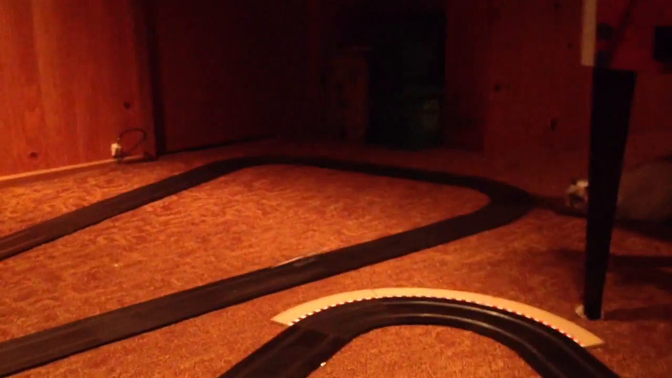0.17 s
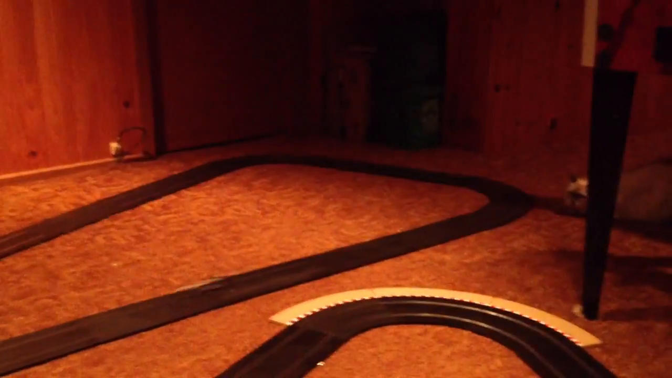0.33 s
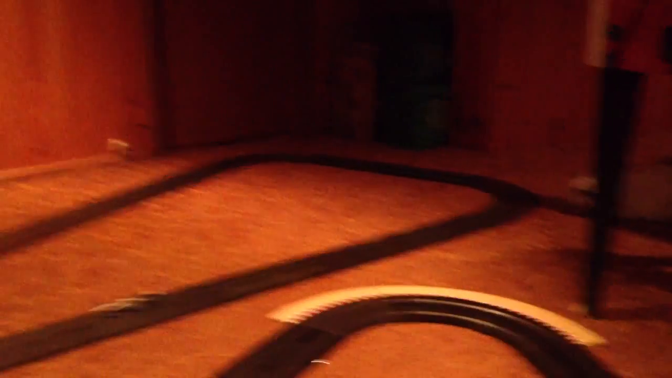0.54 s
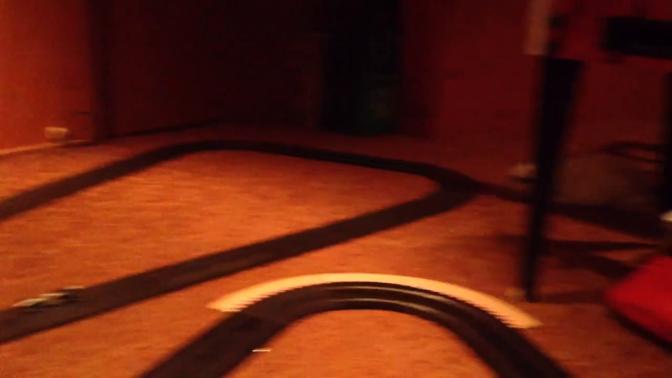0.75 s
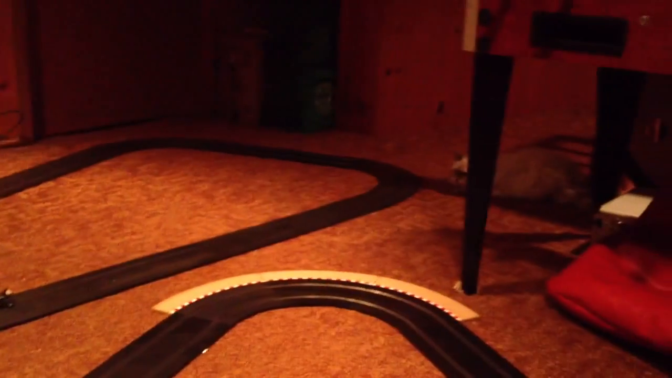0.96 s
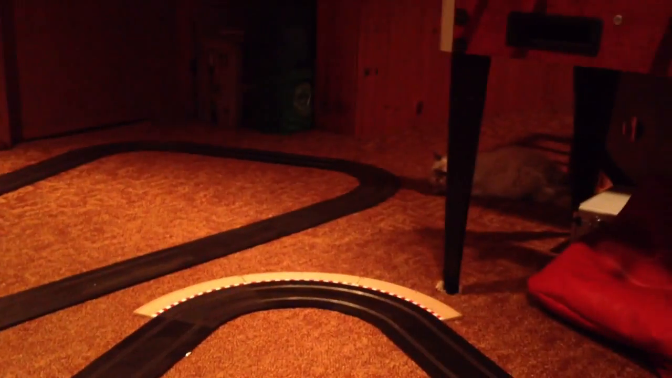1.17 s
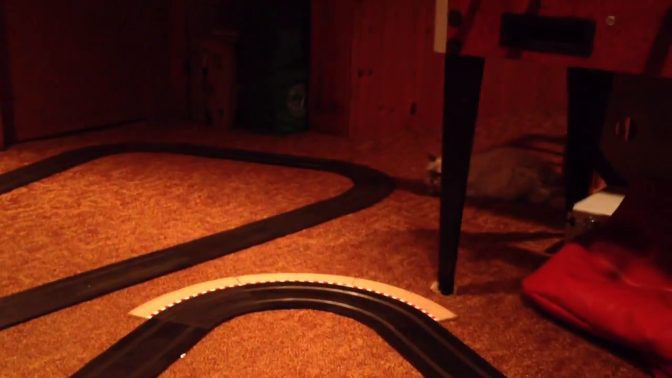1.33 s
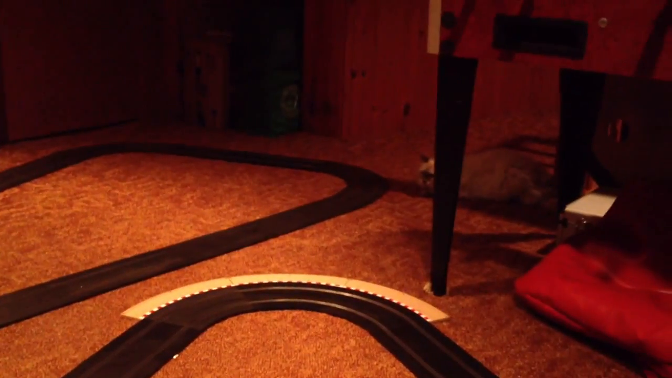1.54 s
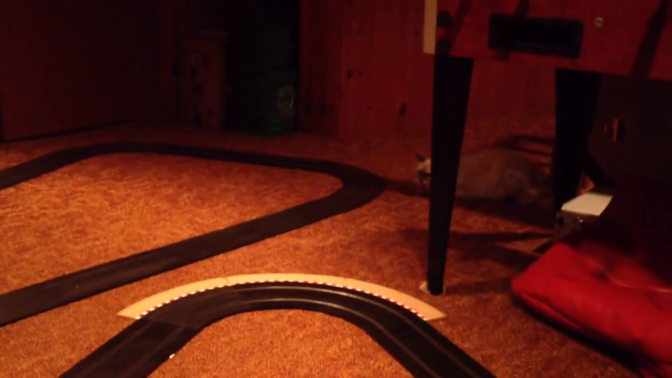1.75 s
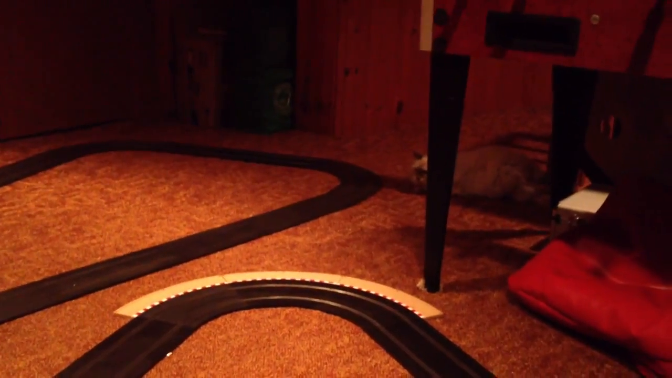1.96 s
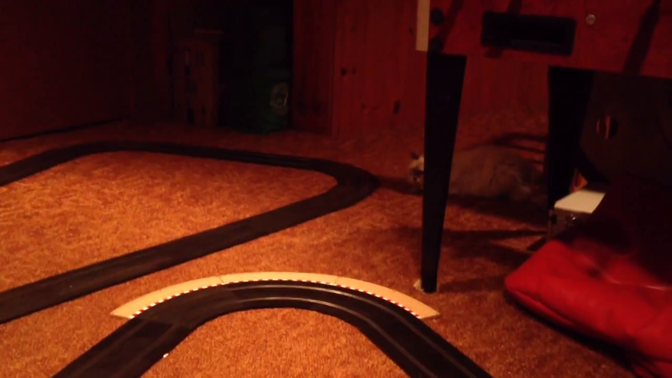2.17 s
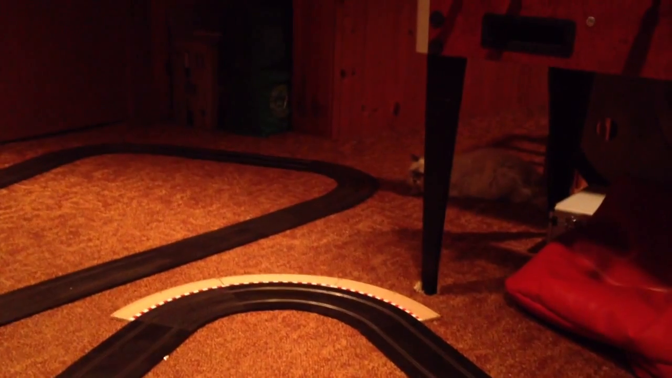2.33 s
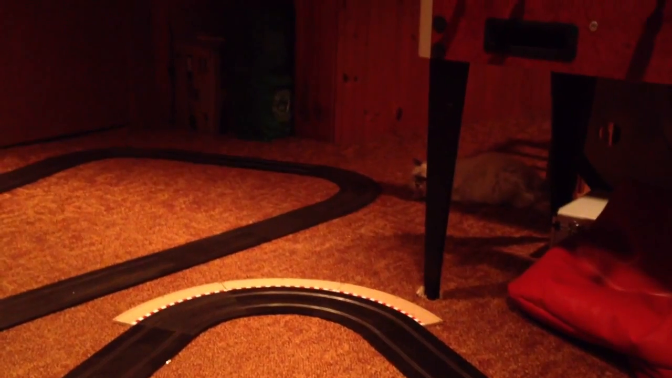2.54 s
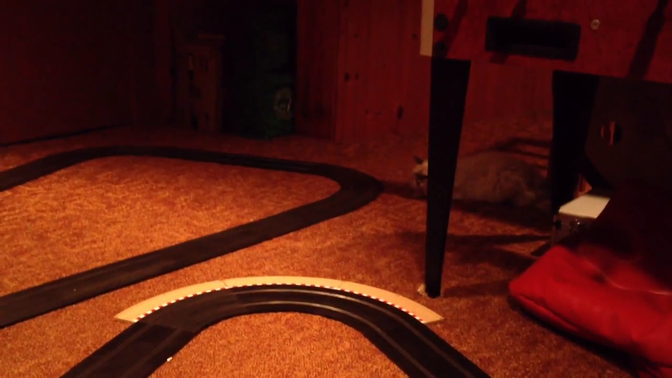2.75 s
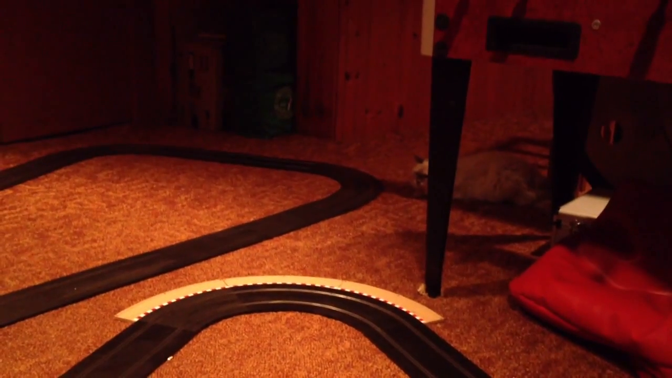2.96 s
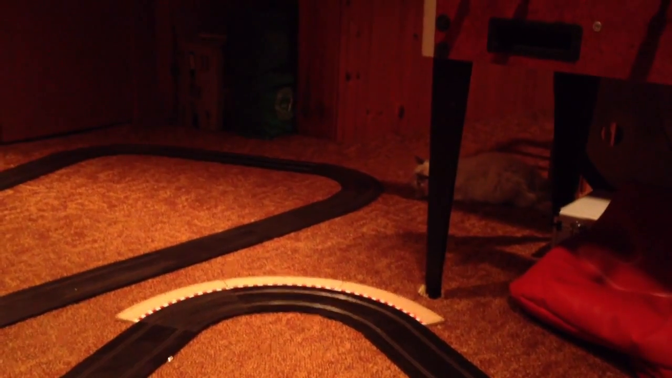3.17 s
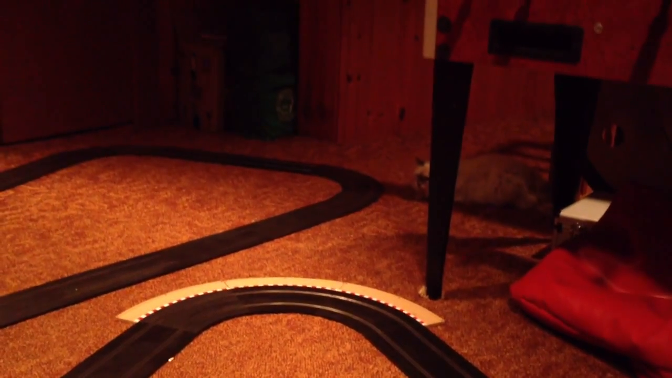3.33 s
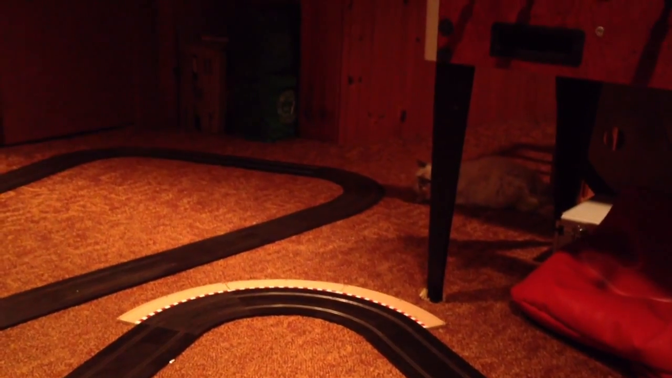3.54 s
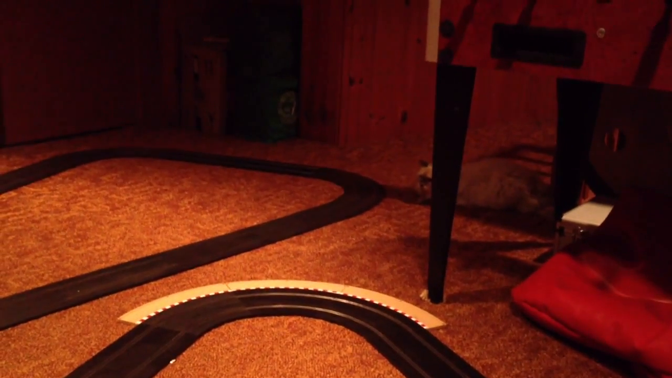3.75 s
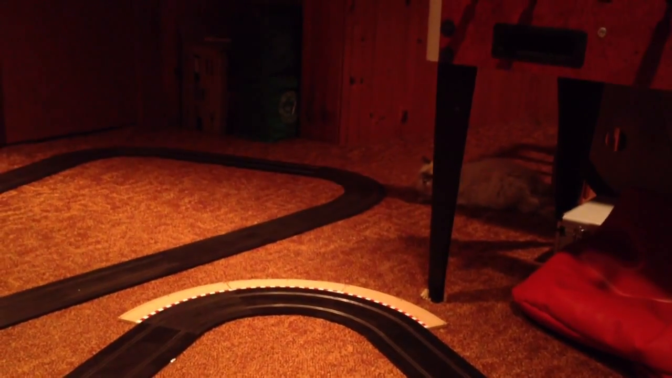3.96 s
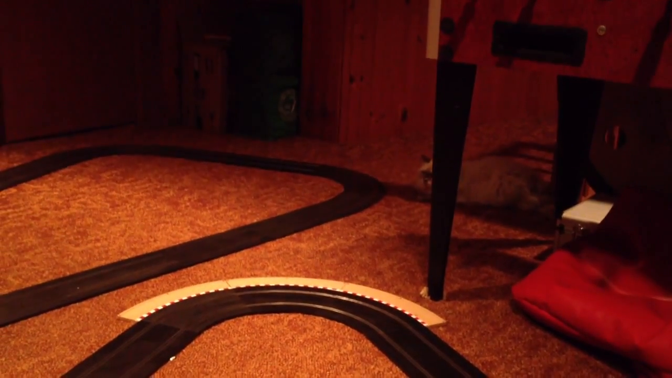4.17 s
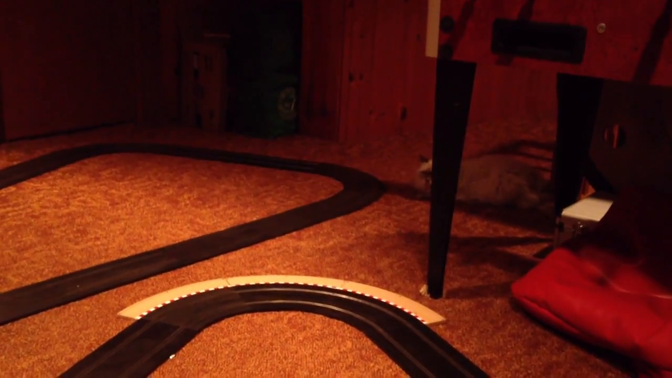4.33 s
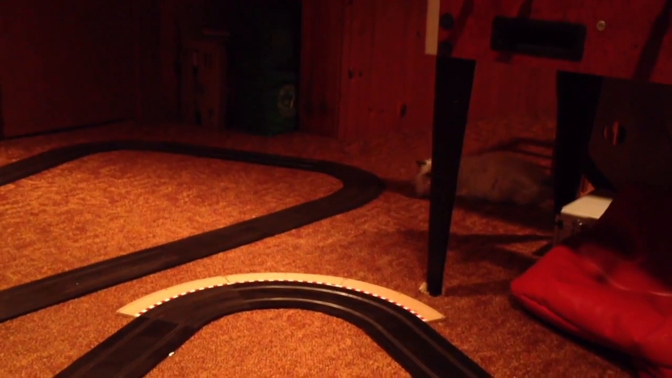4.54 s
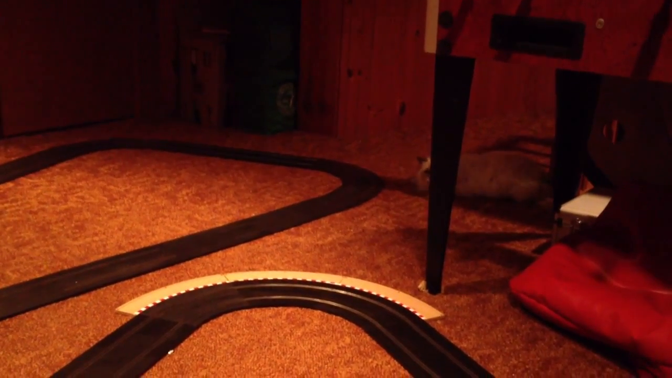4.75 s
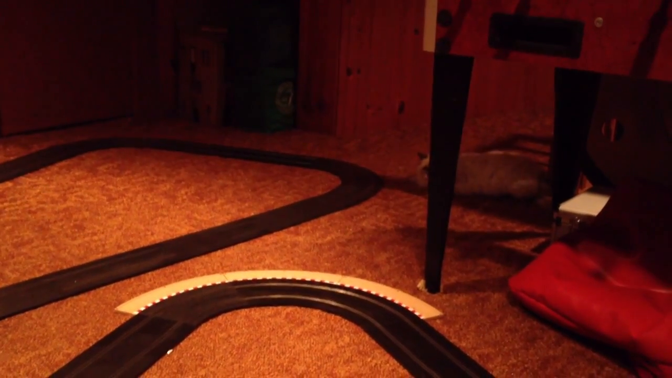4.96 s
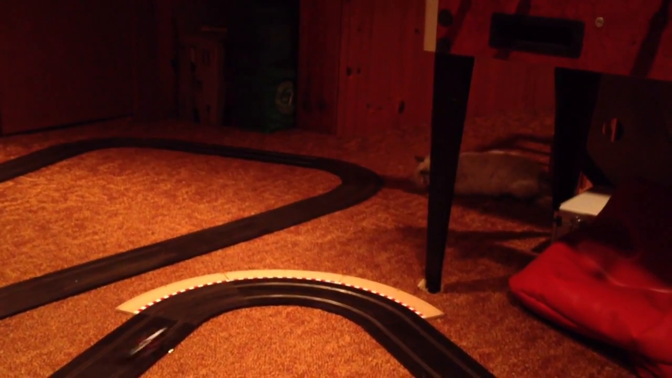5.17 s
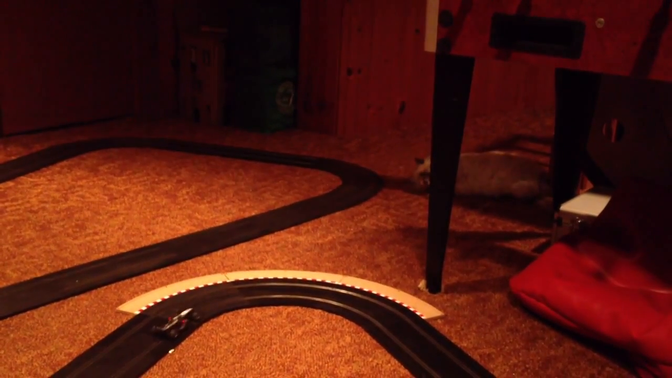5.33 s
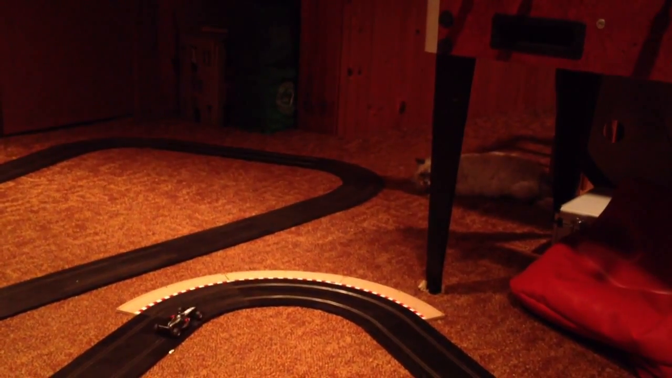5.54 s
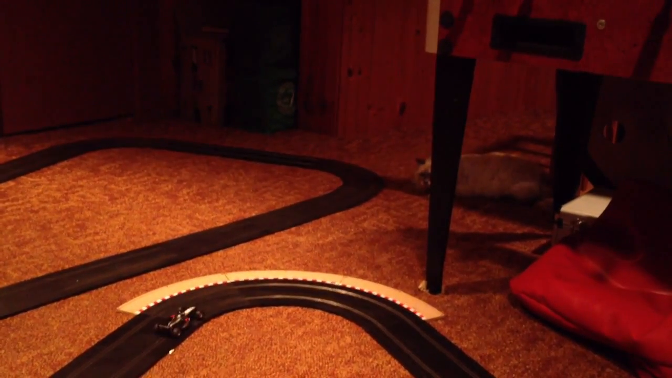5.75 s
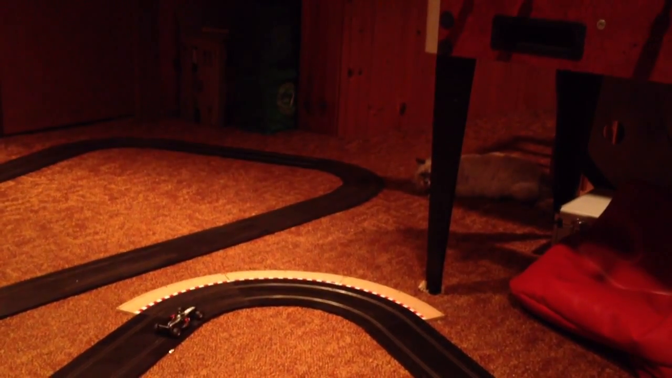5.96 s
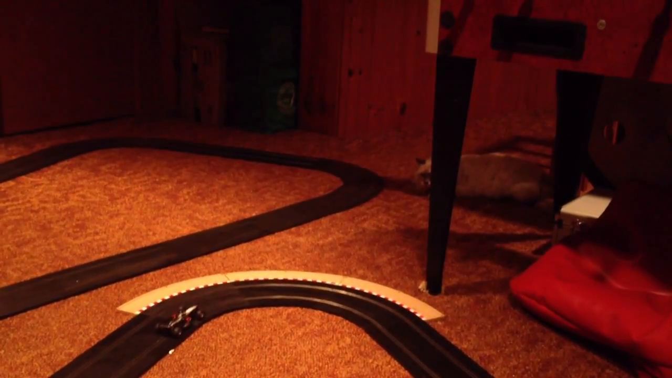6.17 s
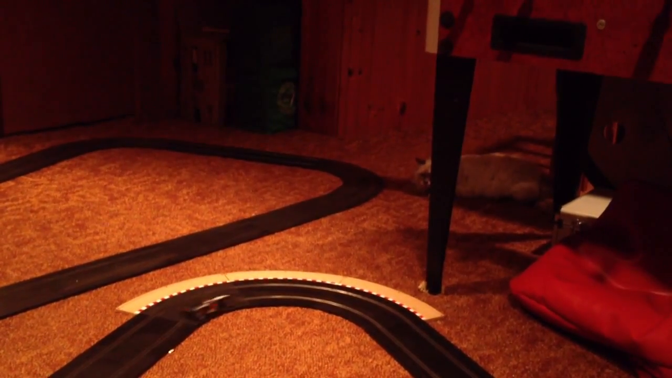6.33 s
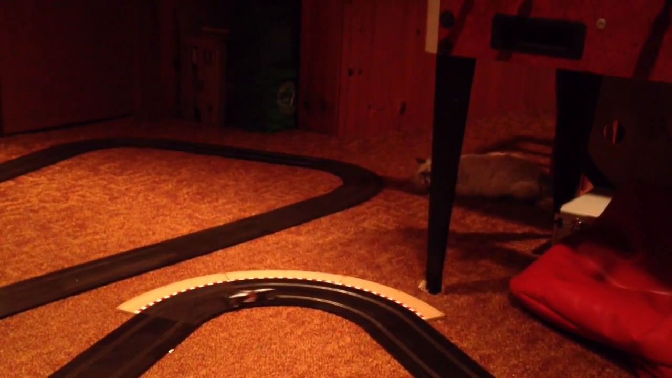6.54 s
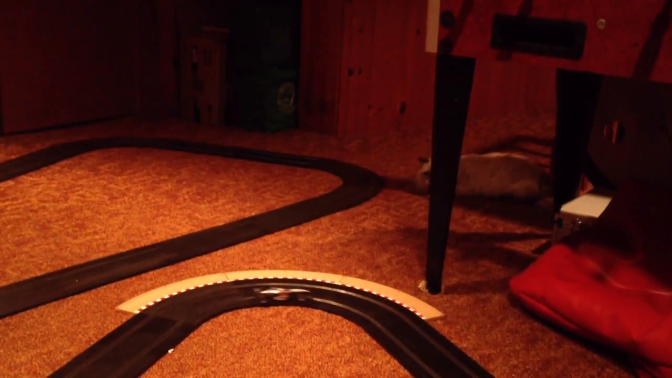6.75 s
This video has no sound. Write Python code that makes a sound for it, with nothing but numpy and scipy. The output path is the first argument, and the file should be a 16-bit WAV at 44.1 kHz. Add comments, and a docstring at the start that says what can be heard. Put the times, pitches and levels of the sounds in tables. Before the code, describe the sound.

A small electric slot car whirs and rattles round plastic track in spurts, coasting to rests, then buzzes loudly close past and sets off again.

```python
"""A toy slot car is already rolling round a plastic track in a small carpeted, wood-panelled room. Its gears rattle
the shell, the motor knocks once a turn, the braids hiss and the tyres rumble in the hollow track. At once the hand
controller scrapes, its spring ticks and the car snags in its slot. It coasts to rest, then runs again in spurts;
plastic creaks, the track panels drone, and a rising swish leads into a close pass by the microphone near 4.8 s.
It coasts down once more and sets off again. Each part is noise or short clicks, shaped by filters and echoes."""
import sys
import numpy as np
from scipy import signal
from scipy.fft import rfft, irfft
from scipy.io import wavfile
from scipy.ndimage import uniform_filter1d, map_coordinates

SR = 44100
rng = np.random.default_rng(int(sys.argv[2]) if len(sys.argv) > 2 else 0)


def digitize_waveform(pressure):
    """Quantize a signal to 16-bit integers and store it at the path in sys.argv[1].

    Rows of a 2-D input are taken as channels; values are limited to [-1, 1].
    """
    field = np.atleast_2d(pressure).T
    bounded = np.clip(field, -1, 1)
    quanta = np.round(bounded * 32767).astype(np.int16)
    wavfile.write(sys.argv[1], SR, quanta)


N = 299880  # samples, 6.8 s


def undb(db):
    """Turn decibels into a gain."""
    return 10 ** (np.asarray(db) / 20)


def unit(x):
    """Scale a sound to an average strength (rms) of 1."""
    return x / np.sqrt(np.mean(x ** 2))


def curves(table):
    """Join each column of a table by straight lines in time; the first column is the time."""
    s, *columns = np.transpose(table)
    t = np.arange(N) / SR
    return [np.interp(t, s, column) for column in columns]


def walk(rate_hz):
    """A smooth random wander with an rms of 1, taking about rate_hz new values a second."""
    hold = max(int(SR / rate_hz), 1)
    steps = np.repeat(rng.standard_normal(N // hold + 1), hold)
    return unit(uniform_filter1d(steps, hold)[:N])


def colour(x, spectrum, size=4096):
    """Filter a sound to a spectrum of (pitch_hz, level_db) points, with no sound before its cause."""
    hz, db = np.transpose(spectrum)
    bins = np.maximum(np.fft.rfftfreq(size, 1 / SR), 1)
    gain = undb(np.interp(np.log(bins), np.log(hz), db))
    # folding the cepstrum gives the filter minimum phase: its energy comes as early as it can
    cepstrum = irfft(np.log(gain))
    cepstrum[1:size // 2] *= 2
    cepstrum[size // 2 + 1:] = 0
    response = irfft(np.exp(rfft(cepstrum)))
    return signal.fftconvolve(x, response)[:len(x)]


def brighter(spectrum, treble_db):
    """The same spectrum with everything above 5 kHz raised."""
    return [(hz, db + treble_db * (hz > 5000)) for hz, db in spectrum]


def resonate(x, modes):
    """Sum of fixed resonances, each given as (pitch_hz, width_hz, level_db)."""
    return sum(undb(db) * signal.lfilter(*signal.iirpeak(hz, hz / width, SR), x) for hz, width, db in modes)


def ring(x, hz, width_hz):
    """A resonance whose pitch may move from moment to moment, with an rms of 1."""
    spin = np.exp(2j * np.pi * np.cumsum(hz * np.ones(len(x))) / SR)
    lowpass = signal.butter(2, width_hz / 2, fs=SR, output="sos")
    # shift the pitch down to zero, keep what lies near it, and shift back up
    near_pitch = signal.sosfilt(lowpass, x / spin + 1e-18)
    return unit(np.real(spin * near_pitch))


def grains(rate_hz, spread_db):
    """Tiny contacts at random moments and of uneven hardness, with an rms of 1."""
    hardness = np.minimum(rng.exponential(size=N), 4)
    happens = rng.random(N) < rate_hz / SR
    return unit(happens * rng.choice([-1, 1], N) * undb(spread_db * hardness))


def contact(rise_s, size=4096):
    """A short rough contact: noise that swells and dies."""
    age = np.arange(size) / SR / rise_s
    return rng.choice([-1, 1], size) * age * np.exp(1 - age)


def add(out, s, sound, peak_db):
    """Put a sound in at time s with the given peak level."""
    i = int(np.clip(s * SR, 0, N - 1))
    scaled = undb(peak_db) * sound / np.abs(sound).max()
    out[i:i + len(sound)] += scaled[:N - i]


def swell(s, rise_s, fall_s, db):
    """Gain of one movement: it grows to its peak at time s and falls back to silence."""
    return undb(db) * np.interp(np.arange(N) / SR, [s - rise_s, s, s + fall_s], [0, 1, 0])


# spectrum of the steady background: pitch_hz, relative_level_db
HUSH_SPECTRUM = [(15, -46), (86, -27.5), (119, -16), (178, -11), (305, -13.5), (631, -18.5), (895, -20),
                 (970, -20.5), (6210, -25), (9050, -30), (13900, -28), (15500, -27)]
HUSH_DB = -66.5


def background():
    """Steady background: low noise of the quiet room plus a faint hiss."""
    return unit(colour(rng.standard_normal(N), HUSH_SPECTRUM)) * undb(HUSH_DB)


# spurts of throttle:
# pressed_s, released_s, top_motor_turns_hz, coast_to_rest_s, gear_load_db, tyre_load_db
SPURTS = [(-.3, 0.202, 110.8, 0.72, -1.5, -1), (1.399, 1.681, 100.3, 0.46, -2, -1.5),
          (1.868, 2.048, 100.3, 0.13, 0, -1), (2.427, 4.864, 101.3, 0.82, 0.5, -1.5),
          (5.383, 5.452, 60.1, 0.11, -0.5, -1), (6.088, 6.362, 92.5, 0.53, -5, -5.5),
          (6.304, 6.904, 79.5, 0.37, -6, -7)]
SPIN_UP_S, FREEWHEEL_S = .05, 0.22  # time constants: the motor takes up speed; gears go slack after release


def drive():
    """The motor spins up from each press, and friction slows it after release; the fastest spurt rules."""
    t = np.arange(N) / SR
    pressed, released, hz, coast_s, gear_db, tyre_db = np.transpose(SPURTS)[:, :, None]
    since_press = np.maximum(t - pressed, 0)
    since_release = np.maximum(t - released, 0)
    spin_up = 1 - np.exp(-since_press / SPIN_UP_S)
    slow_down = np.clip(1 - since_release / coast_s, 0, 1)
    speeds = hz * spin_up * slow_down
    spurt = speeds.argmax(axis=0)
    freewheel = 1 - np.exp(-since_release[spurt, np.arange(N)] / FREEWHEEL_S)
    # a floor of 1 turn a second keeps the logarithm of speed finite at rest
    return np.maximum(speeds.max(axis=0), 1), freewheel, gear_db[spurt, 0], tyre_db[spurt, 0]


# the car's way round the track, and how its chassis rings there:
# time_s, microphone_distance_m, chassis_against_rattle_db, chassis_pitch_hz (the pitch drifts about this)
PATH = [(.12, 0.85, -1.5, 4320), (.3, 0.86, -3.5, 4230), (.55, 0.68, -8, 4370), (1.6, 1.1, -5, 4370),
        (2.0, 1.58, -7, 4180), (2.6, 1.6, -4, 4220), (3.15, 1.22, -2, 4270), (3.5, 0.88, -2, 4160),
        (3.73, 0.8, -3, 4118), (4.15, 0.66, -5.5, 4050), (4.33, 0.91, -3, 4250), (4.46, 1.02, -6, 4440),
        (4.69, 0.6, -12, 4255), (4.765, 0.21, -2.5, 4000), (4.85, 0.25, -1.5, 3927),
        (5.07, 0.34, -4.5, 4406), (5.5, 0.65, -10, 4660), (6.2, 0.5, -8, 4660), (6.8, 1.1, -1.5, 4340)]


def travel():
    """Distance to the microphone, and level and pitch of the chassis ring, gliding along the path."""
    return curves(PATH)


# how loud each part is, before load and wavering:
# level_at_reference_speed_and_1_m_db, gain_per_tenfold_speed_db, loss_per_tenfold_distance_db, coasting_gain_db
RUMBLE_LAW = (-59.5, 33, 20, 3)
RATTLE_LAW = (-51, 41.5, 22, -2.5)
HISS_LAW = (-58.5, 46.5, 28, -1.5)
REFERENCE_HZ = 100  # motor turns a second


def loudness(law, motor_hz, distance, freewheel):
    """Level in dB of one part of the car: louder when fast and near."""
    db, speed_db, distance_db, coasting_db = law
    speed_gain_db = speed_db * np.log10(motor_hz / REFERENCE_HZ)
    distance_loss_db = distance_db * np.log10(distance)
    return db + speed_gain_db - distance_loss_db + coasting_db * freewheel


def each_turn(turn, decay_s, uneven_db):
    """A short burst of noise once a motor turn, with a random strength each time; rms 1."""
    lap = turn.astype(int)
    age = (np.arange(N) - np.searchsorted(lap, lap)) / SR
    force = undb(uneven_db * np.clip(rng.standard_normal(lap[-1] + 1), -2, 2))[lap]
    return unit(force * np.exp(-age / decay_s) * rng.standard_normal(N))


def axle(turn, slop_turns=.13, uneven_db=6.0, offbeat_db=-3):
    """The axle hits its bearings about twice a motor turn, early or late, hard or soft."""
    beats = np.arange(2 * int(turn[-1]))
    late, force, sign = rng.standard_normal((len(beats), 3)).T
    at = np.minimum(np.searchsorted(turn, beats / 2 + slop_turns * late), N - 1)
    hits = np.zeros(N)
    hits[at] = np.sign(sign) * undb(uneven_db * np.clip(force, -2, 1) + offbeat_db * (beats % 2))
    return unit(hits)


# spectrum of the rattling shell: pitch_hz, relative_level_db
SHELL_SPECTRUM = [(470, -23), (800, -25.5), (1120, -2), (2000, -1.5), (2210, -5.5), (2410, 1), (2830, -2.5),
                  (3460, -1.5), (3960, 0.5), (5680, -7), (7180, -9.5), (9680, -18.5), (11400, -11.5),
                  (14400, -13), (15500, -39)]
# spectrum of a motor knock or of a snag in the slot: pitch_hz, relative_level_db
KNOCK_SPECTRUM = [(60, -79), (300, -38), (900, -17), (2200, 3), (3000, -3.5), (3800, 3), (4600, 4),
                  (5400, -7), (8000, -5), (10000, -10), (11500, -4.5), (13500, -11), (15500, -21)]
# the chassis rings in two bands: pitch_ratio, width_hz, level_db (drifts follow)
CHASSIS_BANDS = [(1, 770, 0), (.5, 430, -9)]


def gears(turn, rattle_db, chassis_db, chassis_hz, knock_db=-9, axle_db=2, teeth_db=-1.0,
          wobble=0.13, drift=0.033, flutter_db=2.0):
    """Teeth click against the shell; the pinion knocks once a turn; teeth and axle ring the chassis."""
    knocks = unit(colour(each_turn(turn, decay_s=.0006, uneven_db=2.5), KNOCK_SPECTRUM))
    once_a_turn = 1 + wobble * np.cos(2 * np.pi * turn)
    teeth = grains(3200, spread_db=2.5) * undb(2.3 * walk(60)) * once_a_turn
    shaking = grains(3200, spread_db=2.5) + undb(axle_db) * axle(turn)
    # the chassis flexes as the car rolls, so each ring drifts in pitch and strength
    chassis = np.zeros(N)
    for ratio, width_hz, db in CHASSIS_BANDS:
        band_hz = ratio * chassis_hz * (1 + drift * walk(12))
        chassis += ring(shaking, band_hz, width_hz) * undb(db + flutter_db * walk(11))
    shell = undb(teeth_db) * unit(colour(teeth, SHELL_SPECTRUM))
    return (shell + undb(knock_db) * knocks + undb(chassis_db) * chassis) * undb(rattle_db)


# spectrum of the rubbing copper braids: pitch_hz, relative_level_db
BRAID_SPECTRUM = [(3000, -50), (5200, -8), (6600, -3.5), (7900, -3), (9300, -8), (15500, -26)]
# spectrum of the braids' sparks: pitch_hz, relative_level_db
SPARK_SPECTRUM = [(900, -46), (3000, 13), (4300, 5), (5500, 4), (10000, -4), (11500, -3.5), (13200, -8),
                  (15500, 3.5)]


def braids(hiss_db, freewheel, turn, spark_db=0):
    """Copper braids rub along the rails; sparks tick once each motor turn and fade after release."""
    rub = unit(colour(grains(5000, spread_db=1.5), BRAID_SPECTRUM))
    sparks = unit(colour(each_turn(turn, decay_s=.0007, uneven_db=3.5), SPARK_SPECTRUM))
    current = undb(spark_db) * np.clip(1 - freewheel, 0, 1)
    return (rub + current * sparks) * undb(hiss_db + 1.66 * walk(30))


# spectrum of the rumbling track: pitch_hz, relative_level_db
TRACK_SPECTRUM = [(35, -50), (60, -61), (96, -12), (135, -11.5), (167, -4.5), (280, -2), (465, -0.5),
                  (562, -6.5), (655, -6), (772, -6), (868, -4.5), (921, -10), (1000, -7.5), (1300, -29),
                  (2200, -120)]
# resonances of the hollow track: pitch_hz, width_hz, level_db (each is passed through twice)
HOLLOW_MODES = [(347, 97, 3.5), (400, 45, -2), (512, 72, 2), (663, 260, 1), (700, 110, -13)]
# loose pieces of track boom as the car rolls over them, each on its own note:
# loudest_s, rise_s, fall_s, level_db, pitch_hz
BOOMS = [(.35, 0.11, 0.08, -57, 510), (2.9, 0.3, .5, -65, 426), (4.17, 0.35, .5, -68, 115),
         (4.57, 0.33, 0.2, -58.5, 440), (4.8, 0.29, 0.16, -48.5, 422), (5.06, 0.086, 0.097, -49.5, 535),
         (5.1, 0.22, 0.28, -60.5, 756), (5.05, 0.3, 0.24, -57, 340), (5.26, 0.076, 0.095, -60, 450),
         (5.47, 0.067, 0.06, -68, 794), (6.28, 0.085, 0.12, -61, 328), (6.58, 0.46, 0.3, -67, 199)]
BOOM_WIDTH = 0.25  # width of a boom's resonance as a share of its pitch
# the wheels bump over track joints: time_s, thump_peak_db, shell_clack_peak_db
JOINTS = [(1.665, -49, -31), (4.06, -39, -32.5), (4.164, -38.5, -33.5), (4.76, -34, -41), (4.845, -39, -42)]


def tyres(rumble_db, freewheel, waver_db=2.0):
    """Tyres shake the hollow track: it rings more plainly when coasting, loose pieces boom, joints thump."""
    rumble = unit(colour(grains(1500, spread_db=-0.5), TRACK_SPECTRUM))
    hollow = unit(resonate(resonate(rng.standard_normal(N), HOLLOW_MODES), HOLLOW_MODES))
    share = np.clip(0.68 * freewheel, 0, 1)
    rolling = np.sqrt(1 - share) * rumble + np.sqrt(share) * hollow
    out = rolling * undb(rumble_db + waver_db * walk(18))
    for s, rise_s, fall_s, db, hz in BOOMS:
        piece = [(hz, BOOM_WIDTH * hz, 0)]
        boom = unit(resonate(resonate(rng.standard_normal(N), piece), piece))
        out += boom * swell(s, rise_s, fall_s, db)
    for s, thump_db, clack_db in JOINTS:
        add(out, s, colour(contact(0.0092), TRACK_SPECTRUM), thump_db)
        add(out, s, colour(contact(0.0061), SHELL_SPECTRUM), clack_db)
    return out


# the controller's wiper slides over its coil:
# fastest_s, rise_s, fall_s, level_db, grip_pitch_hz (the pitch wavers about this)
STROKES = [(.19, 0.082, 0.061, -41.5, 2720), (1.458, 0.06, 0.032, -53.5, 3130),
           (1.505, 0.057, 0.047, -48.5, 3170), (1.675, 0.08, 0.017, -41.5, 3100),
           (4.935, 0.039, 0.04, -35, 2706), (5.439, .015, 0.036, -63, 1660),
           (6.192, 0.012, 0.034, -40.5, 3050), (6.223, 0.017, 0.022, -41.5, 3240),
           (6.376, 0.033, 0.033, -37, 3230)]
# spectrum of the scraping wiper: pitch_hz, relative_level_db
WIPER_SPECTRUM = [(60, -58), (600, -24), (950, -0.5), (2100, -2.5), (2600, -4), (3100, 4), (4600, -11),
                  (8700, -9.5), (10000, -25), (15500, -23)]
# resonances of the controller's body: pitch_hz, width_hz, level_db
BODY_MODES = [(1260, 200, -3), (2010, 340, 8), (5870, 220, 1)]
# the grip is too small to radiate lows: pitch_hz, relative_level_db
GRIP_SPECTRUM = [(500, -17), (900, -16)]


def controller(body_db=-1, grip_db=-3.0, grip_width_hz=750, waver=0.075, judder_db=2.25):
    """The wiper judders over wire turns and rings the plastic grip, whose note shifts with the hand's hold."""
    slips = grains(3600, spread_db=3.0) * undb(judder_db * walk(140))
    grip_hz = curves(STROKES)[-1] * (1 + waver * walk(40))
    wiper = unit(colour(slips, WIPER_SPECTRUM))
    body = unit(colour(resonate(slips, BODY_MODES), GRIP_SPECTRUM))
    grip = ring(slips, grip_hz, grip_width_hz)
    scrape = wiper + undb(body_db) * body + undb(grip_db) * grip
    return unit(scrape) * sum(swell(*stroke[:-1]) for stroke in STROKES)


def snap(spread_s, scatter, size=4096):
    """A dry click smeared by the coils of a spring: highs tend to arrive first, lows a moment later."""
    hz = np.fft.rfftfreq(size, 1 / SR)
    uneven = np.interp(hz, np.linspace(0, SR / 2, 90), rng.uniform(-1, 1, 90))
    delay_s = spread_s * (scatter * (1 + uneven) + np.exp(-hz / 2500))
    # delay at each pitch is the slope of the phase
    return irfft(np.exp(-2j * np.pi * np.cumsum(delay_s) * SR / size))


# the trigger spring ticks:
# time_s, peak_db, lower_ring_hz, middle_ring_db, upper_ring_hz, extra_treble_db
SPRING_TICKS = [(0.149, -31, 1500, -2, 2730, -7), (0.865, -37.5, 1460, 1, 3070, 0),
                (0.947, -38.5, 1540, 4, 2730, 0), (1.032, -40, 1700, 1, 2670, -3),
                (1.137, -49.5, 1140, -7, 1400, -6), (1.327, -41.5, 1200, -3, 3280, 12),
                (2.235, -36, 1280, 8, 3100, 8), (2.341, -44, 1500, 5, 2900, -3),
                (2.386, -45, 1400, 5, 3160, -1), (4.993, -29, 1440, -7, 1770, -6),
                (6.092, -40, 1536, 7, 3200, -8), (6.335, -34.5, 1300, -6, 2200, 0)]
# spectrum of a spring tick: pitch_hz, relative_level_db
TICK_SPECTRUM = [(100, -88), (650, -8), (1250, 0.5), (2000, -1.5), (3250, -3), (4500, -12), (8500, -18.5),
                 (10000, -43)]


def spring(middle_hz=2000, width_hz=520, upper_db=-3, tick_db=0):
    """The trigger's spring slips in single ticks, each ringing at three pitches."""
    out = np.zeros(N)
    for s, peak_db, lower_hz, middle_db, upper_hz, treble_db in SPRING_TICKS:
        slip = colour(snap(spread_s=.0022, scatter=0.905), brighter(TICK_SPECTRUM, treble_db))
        modes = [(lower_hz, 0), (middle_hz, middle_db), (upper_hz, upper_db)]
        rings = sum(undb(db) * ring(slip, hz, width_hz) for hz, db in modes)
        add(out, s, unit(rings) + undb(tick_db) * unit(slip), peak_db)
    return out


# the guide pin and braids snag hard in the slot; the loud row at 4.7784 s is instead one more hard gear knock,
# closing the first chatter run: time_s, peak_db, extra_treble_db
SNAGS = [(0.2114, -30, 6), (0.44, -36, 0), (0.5698, -40.5, -9), (0.712, -39.5, -0.5), (1.4558, -39.5, -10),
         (1.5673, -33, 3), (1.5866, -27, 2.5), (1.636, -32.5, 11), (1.685, -26.5, 6), (1.9178, -30, -1),
         (1.9913, -35, -4), (2.029, -30, -4), (2.5475, -35, -2), (2.639, -27.5, 1), (2.726, -29, 1),
         (2.776, -29, 0.5), (2.835, -29.5, 1.5), (2.898, -28.5, 2), (2.9282, -27, 1.5), (3.3456, -32, 0),
         (3.4354, -31, 4), (3.5154, -33, 4), (3.585, -32, -7), (3.635, -33, 1), (3.728, -26, -13),
         (4.069, -28, -14), (4.3235, -31.5, -7), (4.6585, -18.5, 2), (4.687, -35, -5), (4.7784, -13.5, 3.5),
         (4.9994, -22.5, 4), (5.022, -29, 1), (5.0451, -29, -6), (6.1439, -35, -7), (6.261, -31.5, 9),
         (6.392, -29, 1)]
# gear chatter, one hard knock each motor turn:
# start_s, length_s, first_knock_peak_db, growth_db_per_s, extra_treble_db
CHATTER = [(4.7305, .044, -17, 80, 1.5), (4.821, .033, -16.5, -38, 3)]


def rattles(motor_hz):
    """Single snags in the slot and short runs of gear chatter, each a tiny burst of rough noise."""
    out = np.zeros(N)
    for s, peak_db, treble_db in SNAGS:
        scratch = contact(rise_s=.00065)
        add(out, s, colour(scratch, brighter(KNOCK_SPECTRUM, treble_db)), peak_db)
    for start, length, first_db, growth, treble_db in CHATTER:
        turn_s = 1 / motor_hz[int(start * SR)]
        for s in np.arange(start, start + length, turn_s):
            knock = contact(rise_s=.0005)
            knock_db = first_db + growth * (s - start)
            add(out, s, colour(knock, brighter(KNOCK_SPECTRUM, treble_db)), knock_db)
    return out


# plastic rubs on plastic in short creaks and squeaks:
# loudest_s, rise_s, fall_s, level_db, pitch_hz, width_hz
CREAKS = [(1.28, .1, 0.053, -64, 1300, 800), (1.505, 0.066, 0.042, -49, 1210, 550),
          (5.357, .006, 0.046, -61, 2320, 700), (6.137, .002, 0.0039, -50, 4750, 600),
          (6.145, 0.0027, 0.0048, -45, 5940, 1200), (6.358, .004, .006, -43, 5830, 453)]


def creaks():
    """Plastic sticks and slips in tiny random contacts, each rub ringing on its own note."""
    slips = grains(3600, spread_db=2.5)
    return sum(ring(slips, hz, width_hz) * swell(s, rise_s, fall_s, db)
               for s, rise_s, fall_s, db, hz, width_hz in CREAKS)


# track panels drone under the car: time_s, upper_ring_hz, upper_ring_db, lower_ring_db
PANEL = [(3.4, 2040, -75, -87), (3.7, 2040, -52, -66), (4.05, 1926, -64, -64), (4.17, 1803, -57, -56),
         (4.3, 1701, -55.5, -63.5), (4.62, 1623, -54, -56), (4.75, 1624, -66, -56)]


def panels(width_hz=380, low_hz=800, low_width_hz=210):
    """Two bands of rolling noise; the upper one sinks as the car moves along the panels."""
    hz, upper_db, lower_db = curves(PANEL)
    rolling = rng.standard_normal(N)
    t = np.arange(N) / SR
    upper = ring(rolling, hz, width_hz) * undb(upper_db)
    lower = ring(rolling, low_hz, low_width_hz) * undb(lower_db)
    return (upper + lower) * (t > PANEL[0][0]) * (t < PANEL[-1][0])


# the braids swish along the rails, higher as the car comes round: time_s, pitch_hz, level_db
SWISH = [(4.3, 4970, -70), (4.42, 5520, -51), (4.56, 6380, -51), (4.7, 6760, -73), (4.8, 7200, -55)]


def swish(width_hz=1700):
    """A rising band of braid noise leading into the close pass."""
    hz, db = curves(SWISH)
    t = np.arange(N) / SR
    band = ring(grains(5400, spread_db=1.0), hz, width_hz)
    return band * undb(db) * (t > SWISH[0][0]) * (t < SWISH[-1][0])


def bounces(x, turn, depth=0.019):
    """Echoes off the floor and furniture, whose delays slide as the car travels."""
    n = np.arange(N)
    out = x.copy()
    for middle_lag_s, turns_per_swing in [(.0019, 512), (.0043, 716)]:
        lag = middle_lag_s * SR * (1 + .5 * np.sin(2 * np.pi * turn / turns_per_swing))
        out += depth * map_coordinates(x, [n - lag], order=3)
    return out / np.sqrt(1 + 2 * depth ** 2)


ROOM_T60_S = 0.22  # time for the lower notes of the tail to fall by 60 dB


def room(x, wet, treble_t60_s=0.13):
    """Direct sound plus a short tail of fading noise; wet is the tail's strength against the direct sound."""
    t = np.arange(SR // 2) / SR
    noise = rng.standard_normal(len(t)) * (t > .004)
    low = signal.sosfilt(signal.butter(1, 5000, fs=SR, output="sos"), noise)
    treble = noise - low
    tail = low * 1000 ** (-t / ROOM_T60_S) + 1.02 * treble * 1000 ** (-t / treble_t60_s)
    direct = x / np.sqrt(1 + wet ** 2)
    return direct + signal.fftconvolve(direct * wet, tail / np.linalg.norm(tail))[:N]


def moving_room(x, wet, turn, count):
    """Each stretch of track excites the room differently; the car glides from one to the next."""
    place = turn / turn[-1] * (count - 1)
    out = np.zeros(N)
    for k in range(count):
        nearness = np.cos(np.pi / 2 * np.clip(place - k, -1, 1)) ** 2
        out += room(x * nearness, wet)
    return out


WET_AT_1M, SNAG_WET_AT_1M = 0.46, 0.71  # strength of the room's tail against the direct sound
WET_GROWTH = 0.032  # power of distance


def scene():
    """Car, controller and the steady background."""
    motor_hz, freewheel, gear_db, tyre_db = drive()
    distance, chassis_db, chassis_hz = travel()
    rumble_db, rattle_db, hiss_db = (loudness(law, motor_hz, distance, freewheel)
                                     for law in (RUMBLE_LAW, RATTLE_LAW, HISS_LAW))
    # motor turns so far, at a slightly uneven speed
    turn = np.cumsum(motor_hz * (1 + .02 * walk(15))) / SR
    car = gears(turn, rattle_db + gear_db, chassis_db, chassis_hz)
    car += braids(hiss_db + gear_db, freewheel, turn)
    car += tyres(rumble_db + tyre_db, freewheel)
    car += panels() + swish()
    # the light track radiates no deep bass
    car = signal.sosfilt(signal.ellip(7, .5, 60, 88, "high", fs=SR, output="sos"), car)
    # the further off the car is, the more of the room is heard
    far = distance ** WET_GROWTH
    rolling = moving_room(bounces(car, turn), WET_AT_1M * far, turn, count=24)
    hand = room(controller() + spring() + creaks(), wet=.33)
    hush = background()
    snagging = room(rattles(motor_hz), SNAG_WET_AT_1M * far)
    return (rolling + snagging + hand + hush)[None]


TOP_HZ = 15500


def record(dry):
    """A steep filter takes away the highest treble, above TOP_HZ."""
    return signal.sosfilt(signal.ellip(10, .2, 70, TOP_HZ, fs=SR, output="sos"), dry)


dry = scene()
out = record(dry)
digitize_waveform(out)
```